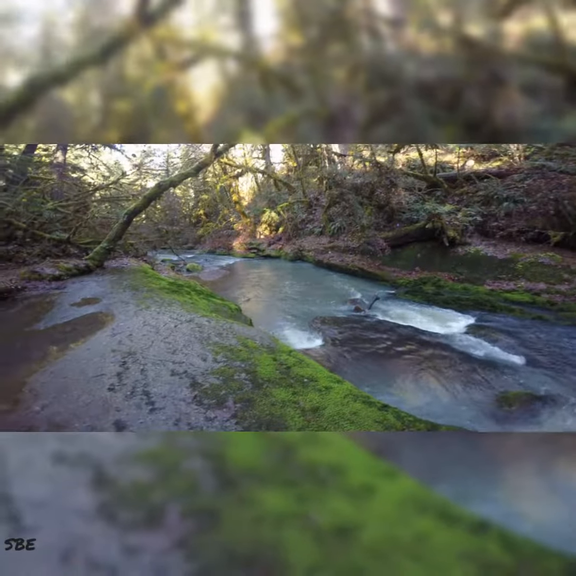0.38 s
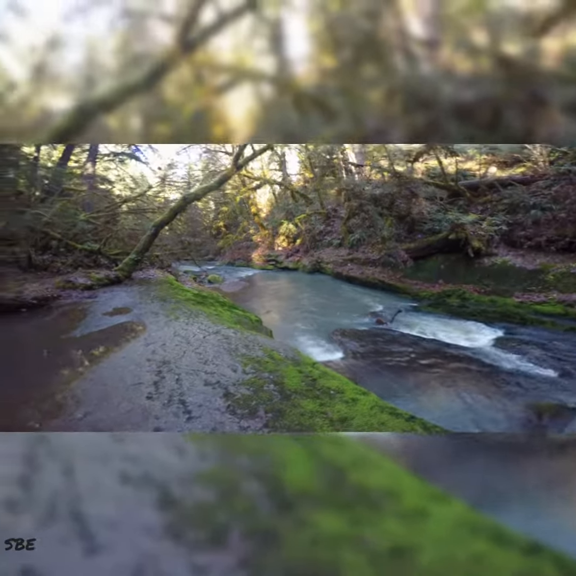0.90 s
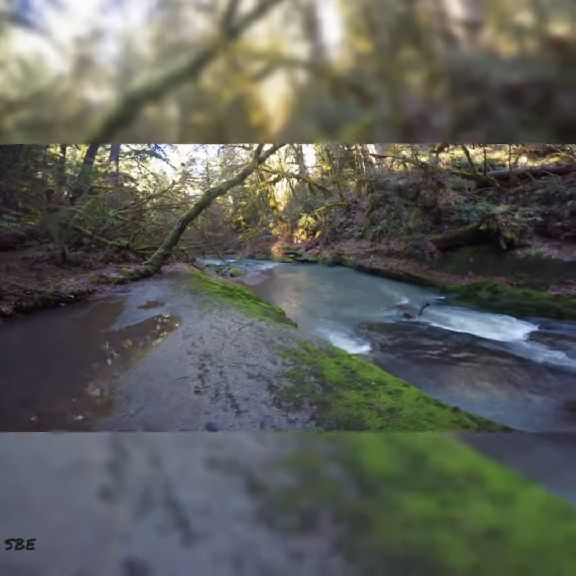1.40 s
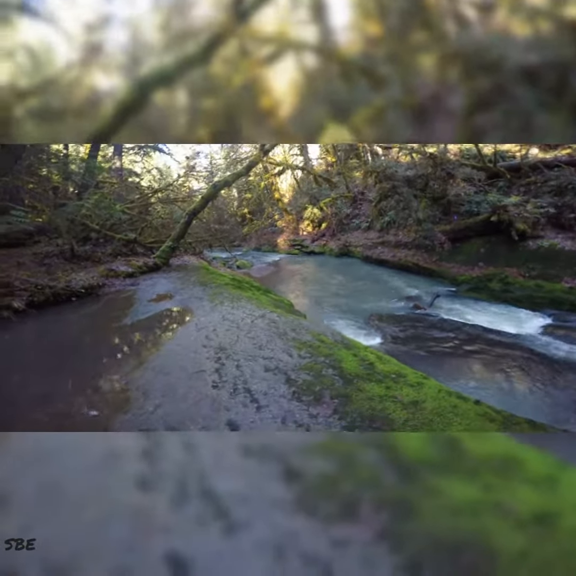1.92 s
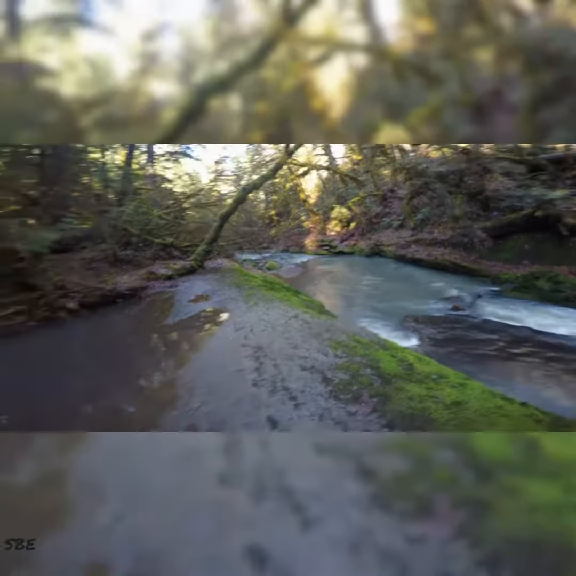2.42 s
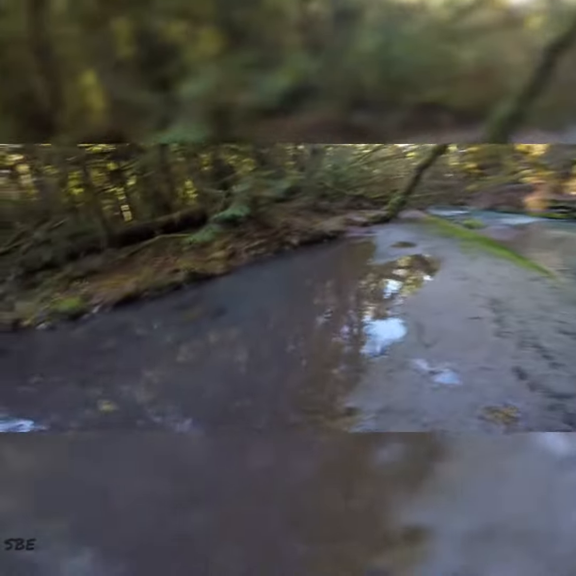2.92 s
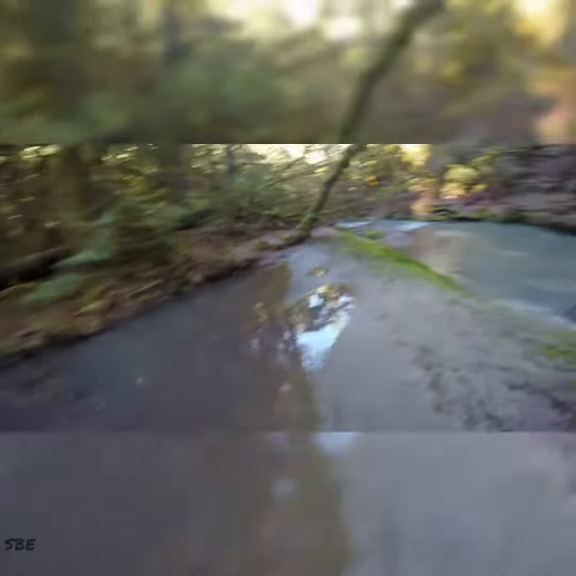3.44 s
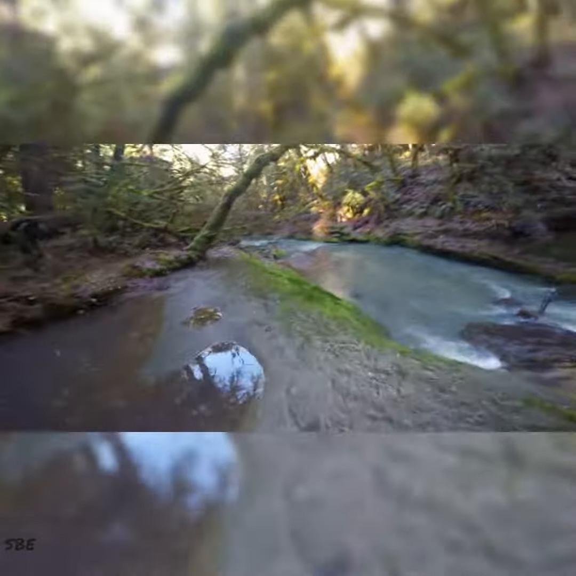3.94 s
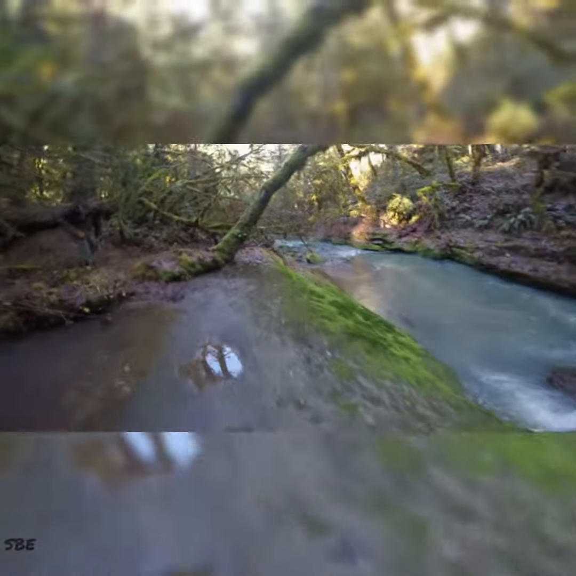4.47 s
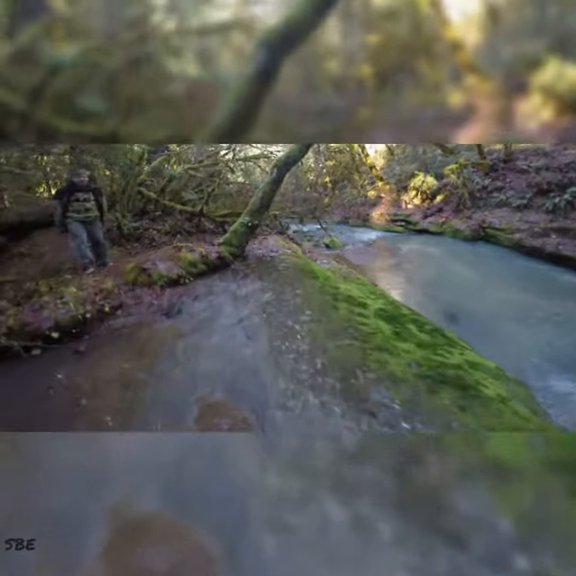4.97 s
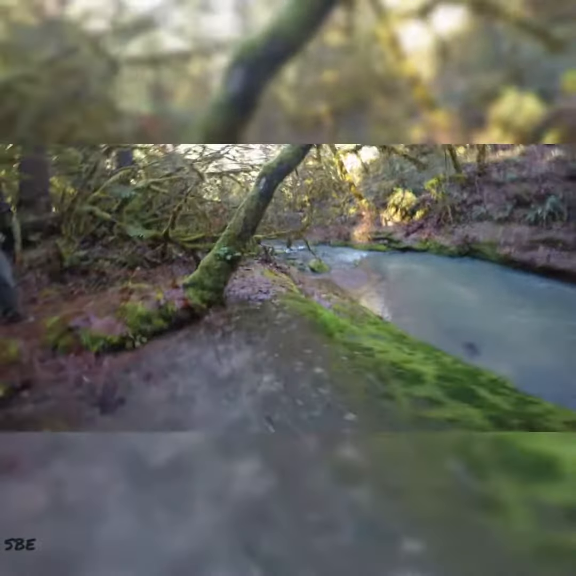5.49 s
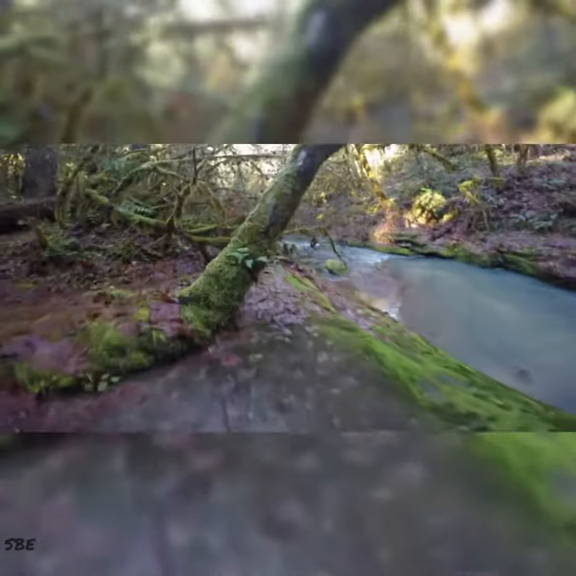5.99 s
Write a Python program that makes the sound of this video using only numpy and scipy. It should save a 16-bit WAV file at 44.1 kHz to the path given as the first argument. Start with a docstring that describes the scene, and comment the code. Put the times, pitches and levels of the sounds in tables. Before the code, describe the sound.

A forest creek pours over low rock steps, heard close by through a small camera's sealed case. From 0 to 2.2 seconds the white water is a steady, dense, midrange hiss with fine gurgling bubbles and a dull lumpy wash below; its treble is slightly wide and flickers. Very low air rumble swells in irregular puffs, with faint soft bumps near 0.05, 0.3 and 0.9 seconds. From 2.3 to 2.7 the hiss sinks as the camera turns, recovers around 3 with a changed, hollower colour, then falls by 3.5 and stays quieter. Small bubble plinks appear between 2.9 and 3.3, another at 4.15. Rumble gusts are strongest from 3.8 to 5.2, with dull bumps at 3.1, 4.05 and 5.05. A quick soft tap cluster rings the case at 5.27; a very faint one comes at 6.0 as the water fades slightly.

```python
"""White water hisses over rock steps in a forest creek, heard by a small camera in a sealed case.
The camera turns and moves away, so the hiss falls and changes colour. Water is shaped noise with bursts
and ringing bubbles; air on the port is low noise with gusts. Dull bumps and, late on, light taps come
through the case as swelling low tones and ringing modes."""
import sys
import numpy as np
from scipy import signal
from scipy.fft import rfft, irfft, next_fast_len
from scipy.io import wavfile
from scipy.ndimage import uniform_filter1d

SR = 44100
rng = np.random.default_rng(int(sys.argv[2]) if len(sys.argv) > 2 else 0)


def to_wav(sig):
    """Store sig (one row per channel, or 1-D mono) as 16-bit WAV at the path in sys.argv[1].

    Samples outside -1..1 are clipped; the rate is SR.
    """
    pcm = np.clip(np.atleast_2d(sig), -1, 1) * 32767
    pcm = np.round(pcm).astype(np.int16)
    wavfile.write(sys.argv[1], SR, pcm.T)  # frames by channels


def voltage_ratio(level):
    """Linear amplitude factor for a level in decibels (scalar or array-like)."""
    return 10 ** (np.asarray(level, float) / 20)


N = 269892

# Course of the white-water hiss. Each row: time in seconds, level in dB before wavering and flutter.
HISS = [(0.0, -48), (0.68, -47), (1.3, -49), (2.18, -50.5), (2.5, -52), (2.68, -53.5), (2.87, -50.5),
        (3.1, -49.5), (3.3, -52), (3.54, -54), (4.0, -54), (4.74, -54.5), (5.52, -54), (6.12, -56.5)]
# Colour of the water with the case slanted to it. Each row: frequency in Hz, relative density in dB per Hz.
SLANTED = [(290, -32), (500, -11), (900, -5.5), (1500, -2.5), (1900, -6), (2300, -4), (2900, -11),
           (3430, -6), (4500, -10.5), (6300, -16.5), (7600, -20.5), (10000, -24.5), (11500, -25),
           (13000, -28.5), (15300, -27)]
# Peaks and dips of the cavity in front of the microphone.
# Each row: centre in Hz, bell width (one sigma) in Hz, height in dB.
CASE = [(597, 31, 5), (940, 90, -1.5), (1099, 62, -7), (1530, 69, 3), (1694, 26.4, -7.5), (1866, 138, 4),
        (2360, 114, 3.5), (2745, 57, -4.5), (2866, 110, 5), (3330, 230, 2), (4140, 110, 2), (4850, 79, 5),
        (4920, 82, -2.5), (5900, 100, -3.5), (6030, 89, 1.5), (11500, 570, 2)]


def rms_one(x):
    """Scaled to rms 1."""
    return x / np.sqrt(np.mean(x ** 2) + 1e-20)


def in_time(rows):
    """Table columns after the time column, as one value per sample."""
    s, *columns = np.transpose(rows)
    return [np.interp(np.arange(N) / SR, s, column) for column in columns]


def drift(rate_hz):
    """Slow chance of spread 1: coarse noise through a double one-pole low-pass."""
    coarse = 40  # samples between coarse values
    r = np.exp(-2 * np.pi * rate_hz * coarse / SR)
    noise = rng.standard_normal(N // coarse + 2002)
    slow = signal.lfilter([1], [1, -2 * r, r * r], noise)[2000:]  # without the filter's start
    return np.interp(np.arange(N) / coarse, np.arange(len(slow)), rms_one(slow))


def coloured(source, spectrum, resonances=()):
    """The source shaped by a spectrum and by bell-shaped peaks and dips; rms 1."""
    size = next_fast_len(N)
    hz = np.arange(size // 2 + 1) * SR / size + 1e-3
    corner_hz, corner_db = np.transpose(spectrum)
    db = np.interp(np.log(hz), np.log(corner_hz), corner_db, left=-90, right=-90)
    for centre_hz, width_hz, peak_db in resonances:
        db = db + peak_db * np.exp(-.5 * ((hz - centre_hz) / width_hz) ** 2)
    return rms_one(irfft(rfft(source, size) * voltage_ratio(db), size)[..., :N])


def band(x, low_hz, high_hz):
    """A band with sharp edges."""
    size = next_fast_len(N)
    hz = np.arange(size // 2 + 1) * SR / size
    inside = (hz > low_hz) & (hz <= high_hz)
    return irfft(rfft(x, size) * inside, size)[..., :N]


def ringing(x, hz, decay):
    """A two-pole resonator: each click in x rings at one pitch; decay is the gain per sample."""
    w = 2 * np.pi * hz / SR
    return signal.lfilter([0, np.sin(w)], [1, -2 * decay * np.cos(w), decay * decay], x)


def spray(per_s, spread_db, share):
    """Two draws of countless far bubbles (noise) with nearer bursts of uneven size on top."""
    sizes = voltage_ratio(spread_db * np.minimum(rng.exponential(1, (2, N)), 5)) * rng.choice([-1, 1], (2, N))
    bursts = rms_one(sizes * (rng.random((2, N)) < per_s / SR))
    # share is the bursts' part of the power
    return np.sqrt(1 - share) * rng.standard_normal((2, N)) + np.sqrt(share) * bursts


def patchy(water):
    """Each part of the rapids surges on its own, so each band wavers apart from its neighbours."""
    # Borders between the separately wavering bands. One column: frequency in Hz.
    patch_edges = [0, 1700, 2700, 3900, 4900, 5800, 7400, 10000, 20000]
    out = 0
    for low_hz, high_hz in zip(patch_edges, patch_edges[1:]):
        waver_db = 0.35 * drift(1.0) + 0.71 * drift(12.0)
        out = out + voltage_ratio(waver_db) * band(water, low_hz, high_hz)
    return out


def white_water():
    """Centre and width signals of the hiss; each bearing reaches the port with its own colour."""
    # Water faced, side-on and behind. Each row: frequency in Hz, relative density in dB per Hz.
    facing = [(290, -43), (500, -16.5), (824, -10.5), (910, -4.5), (1100, -6), (1480, -2), (1880, -2.5),
              (2650, -11.5), (3480, -3), (4490, -12), (6790, -17.5), (7500, -19.5), (15100, -29.5)]
    side_on = [(500, -19), (900, -4.5), (1300, -6), (1900, -0.5), (2300, -8), (3000, -14), (3900, -9.5),
               (4150, -7), (4420, -3), (4700, -9), (4950, -18), (5500, -17), (6100, -16), (7450, -18.5),
               (7700, -28), (10500, -27.5), (15500, -33)]
    behind = [(290, -50), (500, -26), (545, -14.5), (835, -13), (936, -3.5), (1130, -7.5), (1560, -3.5),
              (1860, -5), (2610, -16), (3380, -8.5), (5480, -15.5), (7830, -22.5), (15100, -31)]
    # How far the case has swung. Each row: time in seconds,
    # bearing (0 facing, 1 side-on, 2 slanted, 3 back to the water).
    bearing = [(0.0, 0.05), (2.5, 0.03), (2.62, 0.32), (2.82, 0.7), (3.0, 0.95), (3.14, 1.03), (3.24, 1.1),
               (3.36, 1.45), (3.52, 1.93), (4.3, 2.08), (4.8, 2.63), (5.3, 3.13), (6.12, 2.82)]
    # Peaks of the port that depend on the bearing. Each row: centre in Hz, bell width (one sigma) in Hz,
    # then height in dB when facing, side-on, slanted and behind.
    port_peaks = [(4400, 140, -0.7, 2.5, 0.1, 0.1), (5380, 160, 5, 1.5, 4.4, 5.3),
                  (6820, 124, 6.5, 1.5, 4, 5.8)]
    scattered_share = 0.074  # part of the power that comes off the trees, always from behind
    shares = np.clip(1 - np.abs(in_time(bearing)[0] - np.arange(4)[:, None]), 0, 1)
    from_behind = np.arange(4)[:, None] == 3
    shares = (1 - scattered_share) * shares + scattered_share * from_behind
    out = 0
    for k, (share, colour) in enumerate(zip(shares, (facing, side_on, SLANTED, behind))):
        peaks = CASE + [(hz, width_hz, peak_db[k]) for hz, width_hz, *peak_db in port_peaks]
        surge = voltage_ratio(0.3 * drift(3.0) + 0.58 * drift(38.0))
        water = coloured(spray(3000, 2.2, share=0.091), colour, peaks)
        out = out + np.sqrt(share) * surge * water
    return voltage_ratio(in_time(HISS)[0]) * patchy(out)


def flutter(depth_db):
    """The level flutters faintly at a steady rate, by depth_db up and down."""
    rate_hz, turn = 46.875, .43  # turn: delay in cycles
    return voltage_ratio(depth_db * np.cos(2 * np.pi * (rate_hz * np.arange(N) / SR - turn)))


def in_steps(marks):
    """One value per step, blended smoothly into the next."""
    step, first_step = 1024, 845  # samples
    line = np.interp((np.arange(N) - first_step) / step + 2, np.arange(len(marks)), marks)
    return np.sin(np.pi / 2 * line) ** 2


def flickering_width(centre, width, wide_db, narrow_db, lift_db):
    """The treble is wide, but every two to five steps it draws in to the centre and is louder there."""
    # Bands under the treble that open wide now and then.
    # Each row: lower edge in Hz, upper edge in Hz, chance of opening per step (0-1) while the treble is wide.
    wide_patches = [(4100, 5000, .05), (4740, 5170, .08)]
    steps = np.cumsum(rng.choice([2, 2, 2, 2, 3, 3, 3, 4, 5], N // 1024))
    marks = np.zeros(steps[-1] + 1)
    marks[steps] = 1
    narrow = in_steps(marks)
    treble = band(centre, 7000, SR / 2)
    centre = centre + treble * (voltage_ratio(lift_db * (narrow - 0.75)) - 1)
    wide = band(width, 5650, SR / 2)
    for low_hz, high_hz, share in wide_patches:
        opened = (rng.random(len(marks)) < share) * (1 - marks)
        wide = wide + in_steps(opened) * band(width, low_hz, high_hz)
    wide = wide * voltage_ratio(wide_db + (narrow_db - wide_db) * narrow)
    return np.array([centre + wide, centre - wide])


def murmur():
    """Large bubbles in the deeper water: a dull, slightly lumpy wash that fades less than the hiss."""
    # Colour of the dull wash. Each row: frequency in Hz, relative density in dB per Hz.
    murmur_colour = [(90, -26), (130, -0.5), (170, -0.5), (300, 0), (500, -2.5), (700, -7), (1000, -10),
                     (1400, -43)]
    mean_db, follows = -62, 0.38  # follows: share of the hiss's swing in dB
    wash = coloured(spray(300, 3.2, share=0.11)[0], murmur_colour)
    hiss_db, = in_time(HISS)
    level_db = mean_db + follows * (hiss_db - hiss_db.mean()) + 0.29 * drift(11.0)
    return voltage_ratio(level_db) * wash


def gurgles():
    """Clumps of small bubbles, each ringing briefly at one of eighteen pitches, follow the hiss."""
    per_s, cycles = 250, 38  # bubbles per second before clumping; cycles to die by 60 dB
    clump_db, level_db = 5.0, -14.5  # swing of the birth rate; level against the hiss
    sizes = voltage_ratio(3.5 * np.minimum(rng.exponential(1, N), 3.5)) * rng.choice([-1, 1], N)
    out, chance = np.zeros(N), rng.random(N)
    dealt = rng.integers(0, 18, N)
    clumps = [drift(7.0) for _ in range(3)]  # low, middle and high pitches clump apart
    for k, hz in enumerate(np.geomspace(1208, 4150, num=18)):
        rate = per_s * voltage_ratio(clump_db * clumps[k // 6])
        born = (dealt == k) & (chance < rate / SR)
        out += ringing(sizes * born + 1e-18, hz, voltage_ratio(-60 * hz / (cycles * SR)))
    return voltage_ratio(in_time(HISS)[0] + level_db) * coloured(out, SLANTED, CASE)


def with_swells(steady_db, swells):
    """A steady level plus swells, rising a little faster than they die, 6 dB down at both ends."""
    rise_share = 0.45  # part of a swell's length spent rising
    t, power = np.arange(N) / SR, voltage_ratio(steady_db) ** 2
    for s, db, length in swells:
        side = length * np.where(t < s, rise_share, 1 - rise_share)
        power = power + voltage_ratio(db - 6 * ((t - s) / side) ** 2) ** 2
    return 10 * np.log10(power)


def air_db():
    """Level of the air on the port in dB: the wavering steady flow and its gusts."""
    # Steady airflow past the port. Each row: time in seconds, rumble level in dB before wavering.
    airflow = [(0.0, -44), (0.12, -46.5), (0.4, -46), (0.9, -41), (0.97, -42), (1.3, -42), (2.3, -42.5),
               (3.2, -46), (4.3, -37), (5.3, -40), (6.12, -39.5)]
    # Gusts on the port. Each row: time of the peak in seconds, peak in dB, length in seconds.
    gusts = [(0.04, -42, 0.056), (0.293, -36, 0.19), (1.064, -35, 0.074), (1.2, -36, 0.1),
             (1.555, -35.5, 0.082), (1.718, -41, 0.017), (1.87, -32.5, 0.11), (2.23, -40, 0.32),
             (2.426, -43, 0.16), (2.564, -37, 0.11), (2.801, -34.5, 0.083), (2.98, -39, 0.37),
             (3.33, -34, 0.15), (3.54, -38.5, 0.22), (3.698, -34, 0.034), (3.852, -31.5, 0.034),
             (4.023, -28, 0.042), (4.14, -35, 0.056), (4.253, -37, 0.036), (4.383, -41, 0.038),
             (4.451, -28.5, 0.024), (4.655, -36.5, 0.14), (5.057, -33, 0.075), (5.185, -30, 0.047),
             (5.473, -43.5, 0.51), (5.863, -33, 0.013), (6.096, -43, 0.096)]
    return with_swells(in_time(airflow)[0] + 1 * drift(18.0), gusts)  # wavers by 1 dB


def evened(swirl, floor, exponent):
    """Noise with part of its own chance swelling divided out; rms 1."""
    power = uniform_filter1d(uniform_filter1d(swirl ** 2, size=1500), size=1500)
    size = np.sqrt(power + floor)
    return rms_one(swirl / size ** exponent)


def rumble(level_db):
    """Slow air swirls push on the port one after another, so the level follows the gusts closely."""
    # Colour of the slow swirls. Each row: frequency in Hz, relative density in dB per Hz.
    rumble_colour = [(3, -34), (5, -17), (16, -3.5), (27, -0.5), (40, 1), (55, -2), (70, -13), (90, -28.5),
                     (130, -66)]
    return voltage_ratio(level_db) * evened(coloured(rng.standard_normal(N), rumble_colour), 0.058, 0.46)


def buffet(level_db):
    """Smaller, faster swirls above the rumble, partly in step with it."""
    # Colour of the quick swirls. Each row: frequency in Hz, relative density in dB per Hz.
    buffet_colour = [(45, -38), (65, 6), (85, -4.5), (110, -8.5), (150, -18.5), (200, -20.5), (300, -61)]
    # Single quick swirls, some strong and some faint.
    # Each row: time of the peak in seconds, peak in dB, length in seconds.
    swirls = [(0.072, -50, 0.052), (0.27, -52, 0.1), (0.504, -54.5, 0.11), (0.713, -53.5, 0.22),
              (1.12, -57, 0.083), (1.493, -50.5, 0.06), (1.58, -52, 0.079), (1.906, -55, 0.11),
              (2.167, -53, 0.25), (2.36, -54, 0.24), (2.622, -65, 0.11), (2.776, -57, 0.12),
              (3.12, -51, 0.063), (3.322, -48, 0.11), (3.528, -57, 0.11), (3.794, -58, 0.12),
              (4.07, -49.5, 0.1), (4.305, -70, 0.088), (4.65, -54.5, 0.22), (5.177, -57, 0.14),
              (5.504, -57, 0.18)]
    mean_db, follows, waver_db = -58.5, 0.16, 3.5  # mean before swirls; share of the air's swing in dB
    db = mean_db + follows * (level_db - level_db.mean()) + waver_db * drift(10.0)
    return voltage_ratio(with_swells(db, swirls)) * evened(coloured(rng.standard_normal(N), buffet_colour), 0.1, 0.2)


def thuds():
    """Short dull bumps through the case: each is a few soft cycles that swell and fade."""
    # Each row: time of the peak in seconds, pitch in Hz, peak in dB, length between -6 dB points in seconds.
    bumps = [(0.045, 124, -53.5, 0.04), (0.27, 123, -54, 0.04), (0.885, 117, -55, 0.045),
             (3.125, 112, -53, 0.043), (4.045, 137, -49.5, 0.03), (5.05, 116, -57.5, 0.059)]
    t, out = np.arange(N) / SR, np.zeros(N)
    for s, hz, db, length in bumps:
        fall_db = 6 * np.minimum((2 * (t - s) / length) ** 2, 20)
        out += voltage_ratio(db - fall_db) * np.cos(2 * np.pi * hz * (t - s))
    return out


def drips():
    """Near bubbles that stand out: short notes that rise as they die."""
    # Each row: start in seconds, starting pitch in Hz, peak in dB.
    bubble_notes = [(2.87, 1860, -41), (2.995, 1870, -42), (3.048, 1750, -44), (3.124, 4600, -39),
                    (3.321, 1640, -43), (4.145, 3270, -44)]
    cycles, bend = 60, 1.3  # starting-pitch cycles to die by 60 dB; pitch rises by 2 * bend per second
    t, out = np.arange(2000) / SR, np.zeros(N)
    for s, hz, db in bubble_notes:
        i = round(s * SR)
        note = np.sin(2 * np.pi * hz * t * (1 + bend * t))
        out[i:i + len(t)] += voltage_ratio(db - 60 * t * hz / cycles) * note
    return out


def taps():
    """A few quick soft contacts set the case modes ringing."""
    # Contacts on the case. Each row: time in seconds, strength in dB before the modes' own levels.
    contacts = [(5.2704, -37.5), (5.2722, -33), (5.2729, -34.5), (5.2778, -52), (6.008, -58)]
    # Ringing modes of the case. Each row: pitch in Hz, relative level in dB before the low-pass,
    # time to die by 60 dB in seconds.
    case_modes = [(340, -17, 0.04), (547, -21, 0.055), (730, 2.5, 0.052), (1038, 6.5, 0.023),
                  (1305, -17, 0.055), (1597, 7, 0.022), (2092, 4, 0.03), (2377, -9, 0.033)]
    clicks, out = np.full(N, 1e-18), np.zeros(N)
    for s, db in contacts:
        clicks[round(s * SR)] = voltage_ratio(db)
    for k, (hz, level_db, t60) in enumerate(case_modes):
        sign = (-1) ** k  # neighbouring modes start in opposite directions
        out += sign * voltage_ratio(level_db) * ringing(clicks, hz, voltage_ratio(-60 / (t60 * SR)))
    return signal.sosfilt(signal.butter(8, 2500, fs=SR, output="sos"), -out)


def scene():
    """Creek, air and contacts at one port; only the upper part of the hiss has width."""
    centre, width = white_water() * flutter(1.1)
    water = flickering_width(centre, width, wide_db=-2.5, narrow_db=-16.5, lift_db=3.5)
    water = water + murmur() * flutter(0.8) + gurgles() + drips()
    air = air_db()
    return water + rumble(air) + buffet(air) + thuds() + taps()


def roll_off(x):
    """The treble ends steeply here."""
    return signal.sosfilt(signal.butter(12, 15240, fs=SR, output="sos"), x)


def record(dry):
    """The finished mix, ready to be written."""
    return roll_off(dry)


dry = scene()
out = record(dry)
to_wav(out)
```